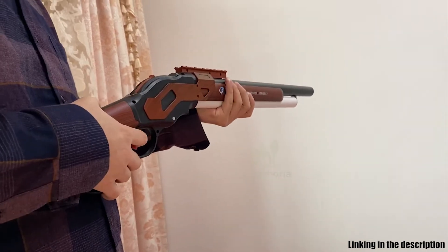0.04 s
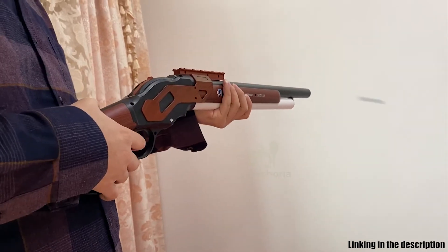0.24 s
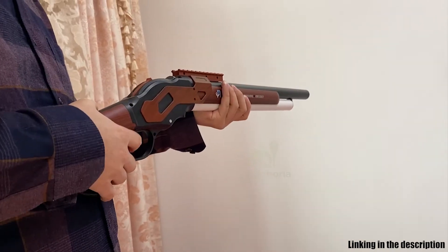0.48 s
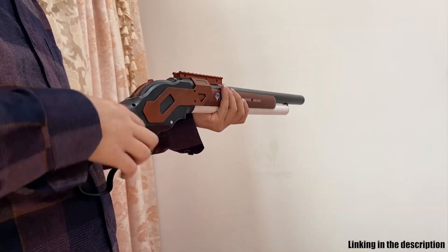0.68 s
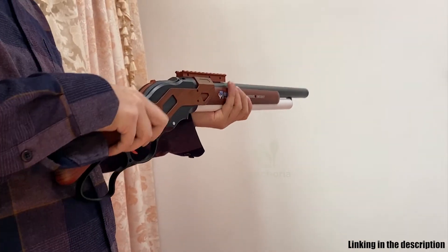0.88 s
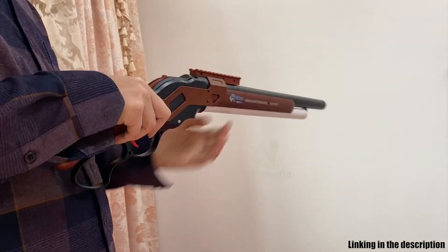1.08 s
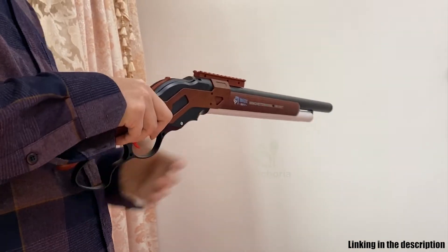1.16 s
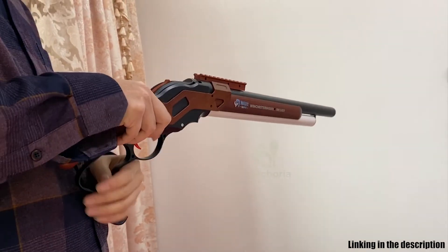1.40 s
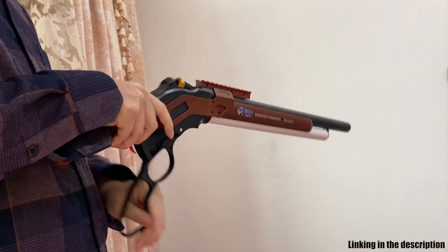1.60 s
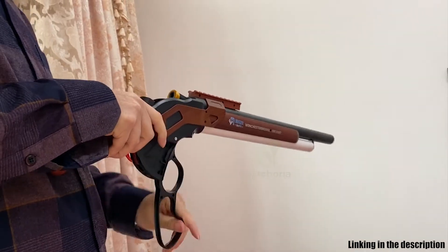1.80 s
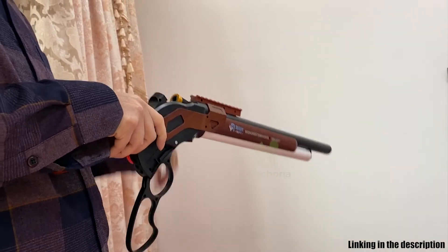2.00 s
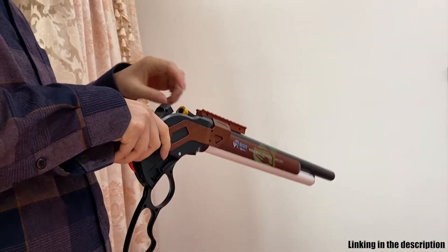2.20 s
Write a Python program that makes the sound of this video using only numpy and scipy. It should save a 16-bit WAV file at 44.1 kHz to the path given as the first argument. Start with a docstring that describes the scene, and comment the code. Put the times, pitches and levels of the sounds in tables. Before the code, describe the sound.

A plastic toy gun fires with a hollow pop, then its lever clacks open.

```python
"""A small, bare room, where two spaced microphones hear a plastic lever-action toy gun fired and cocked.
The spring drives the piston home with a hollow pop; the dart smacks the wall and drops to the floor
while the spring sings on. The hands change grip, then the lever scrapes open and the action clacks
against its stops. The walls return one clear echo and a short tail; sleeves rumble underneath."""
import sys
import numpy as np
from scipy import signal
from scipy.fft import rfft, irfft, next_fast_len
from scipy.io import wavfile
from scipy.ndimage import uniform_filter1d

SR = 44100
rng = np.random.default_rng(int(sys.argv[2]) if len(sys.argv) > 2 else 0)


def log_audio(samples):
    """Write samples as a 16-bit WAV file to the path given in sys.argv[1]."""
    # one column per channel
    frames = np.atleast_2d(samples).T
    # limit to full scale, then quantise
    limited = np.clip(frames, -1, 1)
    pcm = np.round(limited * 32767).astype(np.int16)
    wavfile.write(sys.argv[1], SR, pcm)


N = 99225
TIME = np.arange(N) / SR
FFT_SIZE = next_fast_len(2 * N)
HZ = np.maximum(np.arange(FFT_SIZE // 2 + 1) * SR / FFT_SIZE, 1)
SHOT_S = .2465  # the piston has just slammed home


# Hard hits of trigger, catch, piston, dart, grip and lever: (time [s], level [dB], t60 [s],
# relative bass [dB], middle [dB], treble [dB], top [dB], pan to the left [dB], room send [dB])
CONTACTS = [ (0.2290, -15.5, 0.045, 6, 10, -6, -25, 2, 0), (0.2372, 11.5, .020, 2, 3, -14.5, -6, -3, 5),
            (0.2386, 7, 0.022, 17.5, 10.5, 3, -1, 2.5, -31),
            (0.2463, 17, 0.0089, -19, 8, -11.5, -28, 8.5, -24),
            (0.2520, 6.5, 0.037, 14, -1, -3.5, -56, -9, 5),
            (0.2600, 12, 0.025, 17.5, -2, -11, -15.5, 2, -10),
            (0.3411, 10.5, 0.0063, -25, -33, -4.5, 5, 0.5, -1.5),
            (0.3448, 8.5, 0.0036, -6, -4, 7.5, 3, 4, 0.5), (0.6220, -31, 0.031, 9, 18, -14, -18, 2, 1),
            (0.6780, -32, 0.04, -4, 15.5, -10.5, -17, 1.5, -19.5),
            (0.7561, -14, 0.058, 4, -11.5, 11, -3, -6, 2.5),
            (0.7617, -1.5, 0.0093, -14, -32, 8, 1, 4, -3.5), (0.7644, 0, 0.0034, 7.5, 0, 0, -0.5, 2, 9.5),
            (1.036, -3, 0.057, -11.5, -13.5, 0.5, -17, 4, 3),
            (1.0430, -10.5, 0.0027, 10.5, -0.5, -11, -4, -9, 9),
            (1.1500, -16.5, 0.078, -4.5, -6.5, -4, -21, 14.5, 11.5),
            (1.3762, -18.5, 0.037, -9.5, -9.5, -4.5, -2.5, 3, 0.5),
            (1.4572, -27, 0.027, 2.5, 2, -7, -2.5, 9, 3), (1.5586, -5.5, 0.013, -8, 4, -16, -21.5, 7, 5.5),
            (1.5953, -16, 0.0077, -14, -4.5, -3.5, 0.5, 5, -3.5),
            (1.6458, 2, 0.021, -18.5, 0, -6, -12.5, 1, 4.5),
            (1.6506, 6.5, 0.022, -17, 1.5, -7.5, -5.5, 11, -10),
            (1.7394, 5.5, 0.014, -18.5, -3, -1, -1, -0.5, 2.5),
            (1.7539, 11, 0.0097, -14, 3, -25, -28, 7.5, -5), (1.7571, 7, 0.005, -10, 1.5, -5, -4, 7, 1.5),
            (1.8640, -9.5, .020, -12, -5, -27, -23, 10, -0.5),
            (1.9570, -14, 0.062, -6, -18, 4.5, -10.5, 4, -7),
            (1.9637, 17, 0.0219, -26, -2, -18, -12.5, 3.5, -6),
            (1.9676, 14, 0.013, -10.5, -3.5, -9.5, -29.5, 4, -4.5),
            (1.9829, 4.5, 0.015, -15.5, -1.5, -12, -22, 10, -22), ]
# Spectrum common to all the hits: (frequency [Hz], level [dB])
CONTACT_COLOUR = [(40, -26.5), (100, -13), (200, -7), (330, -2), (480, -5.5), (900, -3), (1500, -0.5),
                  (2100, -1), (3000, -2.5), (3800, -1), (5500, -3.5), (7500, -4), (11000, -5), (16000, -9)]
# Corners of each hit's own tone curve, bass to top: (frequency [Hz])
TONE_CORNERS = (220, 750, 1400, 3050, 3600, 6500, 11000)
def contacts(size=8192):
    """Each contact is a short burst coloured by the parts that meet."""
    hz = np.maximum(np.arange(size // 2 + 1) * SR / size, 1)
    feeds = 0
    for start, db, t60, bass, middle, treble, top, pan_db, room_db in CONTACTS:
        tone = list(zip(TONE_CORNERS, (bass, middle, 0, 0, treble, treble, top)))
        colour_db = at_hz(tone, hz) + at_hz(CONTACT_COLOUR, hz)
        hit = irfft(rfft(burst(t60, size)) * minimum_phase(db + colour_db))
        feeds += send(starting(start, hit), pan_db, room_db)
    return feeds


def burst(t60, size):
    """A dying crackle of micro-impacts with an even spectrum and unit energy."""
    age = np.arange(size) / SR / t60
    fade = from_db(-60 * age) * (1 - np.exp(-age / .098))  # rises in about a tenth of t60
    crackle = rng.standard_normal(size) * fade
    for _ in range(3):  # flatten the spectrum, then restore the decay
        flat = irfft(np.exp(1j * np.angle(rfft(crackle))))
        crackle = flat * np.sqrt(fade)
    return crackle / np.linalg.norm(crackle)


# Modes of the hollow plastic body: (frequency [Hz], relative level [dB], t60 [s])
BODY_MODES = [(105, -7, .18), (133, -2, .2), (186, -2, .2), (201, -7, .46), (254, -10, .23), (321, -8, .18),
              (431, -16, .28), (555, -4, .2), (690, -13, .2), (850, -5, .22), (899, -10, .25),
              (945, -8, .2), (1132, -14, .3), (1192, -14, .3)]
# Modes of the spring: (frequency [Hz], relative level [dB], t60 [s])
SPRING_MODES = [(1954, 10, .62), (2094, 13, .48), (2275, 2, 2.6)]
def shot():
    """The air pops out of the barrel; the hollow body and the spring ring on, left of centre."""
    pop = send(thump(start=.252, db=-8, hz=127.5, t60=.065, rise_s=.002), pan_db=1, room_db=-16)
    body = send(from_db(-19.5) * ring(SHOT_S, BODY_MODES), pan_db=5, room_db=-25)
    spring = send(from_db(-56.5) * ring(SHOT_S, SPRING_MODES), pan_db=6, room_db=-12)
    return pop + body + spring


# Pings on the sharpest hits: (time [s], level [dB], frequency [Hz], t60 [s])
SNAPS = [ (0.3414, -7.5, 2340, 0.0085), (0.3457, -27.5, 2150, .005), (0.7620, -13.5, 2940, 0.0066),
         (1.7571, -8, 5520, 0.0034), (1.9677, -27, 3100, 0.002), ]
def snaps():
    """The dart, the grip and the small parts of the action ring for an instant when struck."""
    pings = sum(ring(start, [(hz, db, t60)]) for start, db, hz, t60 in SNAPS)
    return send(pings, pan_db=3.5, room_db=-1.5)


# Modes of the lever and its housing: (frequency [Hz], relative level [dB], t60 [s])
LEVER_MODES = [(395, -3, .09), (540, -2, .08), (752, -8, .14), (1332, -3, .18), (1432, 0, .3),
               (1610, 1, .2), (1712, -2, .18), (1858, 1, .2), (1956, 1, .36), (2016, 1, .28),
               (2126, -1, .3), (2443, -4, .18), (2532, -2, .24), (2884, -5, .12), (3038, -3, .14)]
# The action meets its stops: (time [s], level [dB])
LEVER_STOPS = [(1.652, -42.5), (1.755, -38.5), (1.965, -34.5)]
def lever():
    """Each stop sets the lever and housing ringing, almost dry, so it sounds close."""
    ringing = sum(from_db(db) * ring(start, LEVER_MODES) for start, db in LEVER_STOPS)
    return send(ringing, pan_db=5.5, room_db=-29.5)


# Course of the scraping, loudest as the lever opens: (time [s], level [dB])
SCRAPE_LEVEL = [(0, -98), (.5, -93), (.62, -63.5), (.72, -66.5), (.95, -62), (1.01, -58), (1.25, -62),
                (1.34, -71.5), (1.44, -67.5), (1.47, -58.5), (1.553, -53), (1.563, -42), (1.585, -56),
                (1.6, -40), (1.68, -46), (1.73, -56), (1.88, -58), (1.97, -57.5), (2.25, -108)]
# Spectrum of the scraping: (frequency [Hz], level [dB])
SCRAPE_COLOUR = [(100, -12.5), (300, -5), (600, 0), (1300, 0.5), (2600, 3.5), (3800, -6.5), (7000, -9),
                 (11000, -10.5), (16000, -11)]
def scrape(slips_per_s=4600):
    """Plastic slides on plastic in a stream of tiny random slips."""
    slips = (rng.random(N) < slips_per_s / SR) * rng.choice([-1, 1], N)
    return send(shaped(slips, SCRAPE_COLOUR) * envelope(SCRAPE_LEVEL), pan_db=2, room_db=-7)


# Soft knocks, centred between the microphones: (time [s], level [dB], frequency [Hz], t60 [s])
KNOCKS = [ (0.58, -26, 410, 0.025), (0.766, -32, 338, 0.26), (1.040, -41.5, 193, 0.13),
          (1.250, -42.5, 403, 0.039), (1.757, -33.5, 434, 0.071), (1.968, -26.5, 379, 0.042), ]
def knocks():
    """Hands on the gun and the falling dart make dull, low knocks."""
    return send(sum(thump(*row, rise_s=.011) for row in KNOCKS), pan_db=0, room_db=-13)


# Decay of the bare room: (frequency [Hz], t60 [s])
ROOM_T60 = [(60, .55), (150, .45), (400, 0.33), (1000, 0.36), (2000, 0.37), (4000, 0.35), (8000, 0.34),
            (15000, 0.26)]
def room(sound, build_s=.0017, echo_s=.0222, echo_db=-10.5):
    """One clear wall echo and a dense tail that dies band by band."""
    noise = rfft(diffuse_noise(), FFT_SIZE)
    centres, decays = np.transpose(ROOM_T60)
    tail = 0
    for share, t60 in zip(np.eye(len(centres)), decays):
        band_gain = np.interp(np.log(HZ), np.log(centres), share)
        band = irfft(noise * band_gain, FFT_SIZE)[:, :N]
        fade = from_db(-60 * TIME / t60) * (1 - np.exp(-TIME / build_s))
        tail += band * fade / np.linalg.norm(fade)
    echo = from_db(echo_db) * starting(echo_s, sound)
    return filtered(sound, rfft(evened(tail), FFT_SIZE)) + echo


def evened(tail, width_hz=60):
    """Smooth away the stray peaks in a dense tail's spectrum."""
    spectrum = rfft(tail, FFT_SIZE)
    bins = width_hz * FFT_SIZE / SR
    power = uniform_filter1d(np.mean(abs(spectrum) ** 2, axis=0), size=int(bins))
    broad_power = uniform_filter1d(power, size=int(10 * bins))
    return irfft(spectrum * np.sqrt(broad_power / power), FFT_SIZE)[:, :N]


# Likeness of the room sound at the two microphones: (frequency [Hz], correlation [0-1])
MIC_LIKENESS = [(60, .97), (200, 0.7), (450, .55), (1000, 0.12), (3000, .35), (7000, 0.13), (12000, 0.9)]
def diffuse_noise():
    """White stereo noise, alike in the bass and at the very top, less so in between."""
    alike = at_hz(MIC_LIKENESS, HZ)
    mid, side = filtered(rng.standard_normal((2, N)), np.sqrt([(1 + alike) / 2, (1 - alike) / 2]))
    return np.array([mid + side, mid - side])


# Course of the handling rumble: (time [s], level [dB])
RUMBLE_LEVEL = [(.25, -62), (.53, -54.5), (.66, -62), (1.03, -73), (1.13, -57.5), (1.35, -62),
                (1.55, -60.5), (1.9, -63.5), (2.25, -75)]
# Spectrum of the rumble: (frequency [Hz], level [dB])
RUMBLE_COLOUR = [(20, -20), (38, -14.5), (55, 1), (90, -8), (180, -9.5), (400, -21), (1000, -23.5),
                 (4000, -53)]
def rumble():
    """Sleeves and hands make a low rumble from the shot onwards."""
    gain = (TIME > SHOT_S) * envelope(RUMBLE_LEVEL)
    return panned(gain * shaped(diffuse_noise(), RUMBLE_COLOUR), pan_db=2.5)


# Spectrum of the quiet background: (frequency [Hz], level [dB])
ROOM_TONE_COLOUR = [(30, -7.5), (150, 5.5), (700, -6), (1500, -19.5), (4000, -22), (8000, -26),
                    (16000, -15.5)]
def room_tone():
    """A faint, steady, mostly low noise at both microphones."""
    return from_db(-73) * shaped(diffuse_noise(), ROOM_TONE_COLOUR)


def ring(start, modes):
    """Damped sines of alternating sign, struck at one moment."""
    partials = (
        (-1) ** k * from_db(db - 60 * TIME / t60) * np.sin(2 * np.pi * hz * TIME)
        for k, (hz, db, t60) in enumerate(modes))
    return starting(start, sum(partials))


def thump(start, db, hz, t60, rise_s):
    """One damped tone with a soft start."""
    fade = from_db(db - 60 * TIME / t60) * (1 - np.exp(-TIME / rise_s))
    return starting(start, fade * np.sin(2 * np.pi * hz * TIME))


def from_db(db):
    """Decibels to gain."""
    return 10 ** (np.asarray(db) / 20)


def at_hz(points, hz):
    """Read a table on a log-frequency axis."""
    corners, values = np.transpose(points)
    return np.interp(np.log(hz), np.log(corners), values)


def envelope(points):
    """Gain over time from (time [s], level [dB]) rows."""
    return from_db(np.interp(TIME, *np.transpose(points)))


def filtered(sound, response):
    """Apply a frequency response."""
    return irfft(rfft(sound, FFT_SIZE) * response, FFT_SIZE)[..., :N]


def minimum_phase(db):
    """Causal response for a dB curve: nothing sounds early."""
    cepstrum = irfft(np.log(from_db(db)))
    half = len(cepstrum) // 2
    cepstrum[1:half] *= 2
    cepstrum[half + 1:] = 0
    return np.exp(rfft(cepstrum))


def shaped(sound, colour):
    """Give a sound a spectrum, at unit rms."""
    sound = filtered(sound, from_db(at_hz(colour, HZ)))
    return sound / sound.std()


def starting(start, sound):
    """Delay a sound by start seconds."""
    return np.pad(sound, (int(start * SR), N))[:N]


def send(sound, pan_db, room_db):
    """Split a source into left, right and room feeds."""
    return from_db([[pan_db / 2], [-pan_db / 2], [room_db]]) * sound


def panned(stereo, pan_db):
    """Lean a stereo sound to the left."""
    return from_db([[pan_db / 2], [-pan_db / 2]]) * stereo


# How far the left microphone leads the right: (frequency [Hz], phase [rad])
LEFT_LEAD = [(500, 1), (1000, 1.22), (2000, 1.26), (4200, 1.5), (7500, 0.26), (10500, 1.5), (16000, 1.5)]
def scene():
    """Direct sound and room reach two spaced microphones, over handling rumble and room tone."""
    feeds = contacts() + shot() + snaps() + lever() + scrape() + knocks()
    direct, room_feed = feeds[:2], feeds[2]
    gun = direct + panned(room(room_feed), pan_db=.77)
    lead = at_hz(LEFT_LEAD, HZ) * np.tanh(HZ / 350) ** 2  # the bass arrives in phase
    spacing = np.exp(.5j * lead * np.array([[1], [-1]]))
    return filtered(gun, spacing) + rumble() + room_tone()


# Two narrow dips in the treble, near 9 and 13 kHz: (frequency [Hz], width [Hz], level [dB])
TREBLE_DIPS = [(9044, 1136, -17.5), (13280, 1700, -14)]
def record(dry):
    """The treble has two narrow dips; the deep bass and the top are cut."""
    dips_db = sum(db / (1 + (2 * (HZ - hz) / width) ** 4) for hz, width, db in TREBLE_DIPS)
    low_cut = signal.butter(3, 52, "high", fs=SR, output="sos")
    top_cut = signal.ellip(10, .2, 80, 15700, fs=SR, output="sos")
    return signal.sosfilt(np.vstack([low_cut, top_cut]), filtered(dry, minimum_phase(dips_db)))


dry = scene()
out = record(dry)
log_audio(out)
```